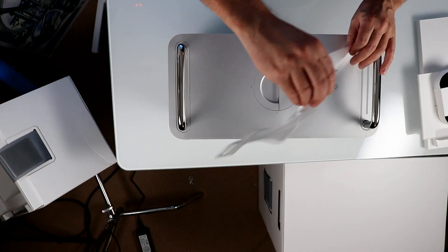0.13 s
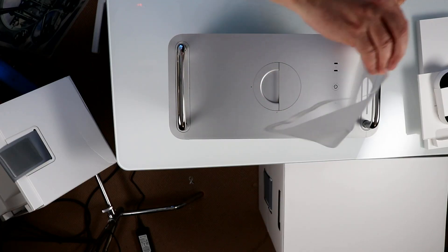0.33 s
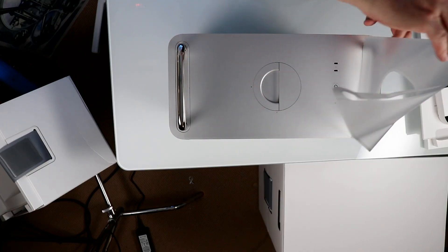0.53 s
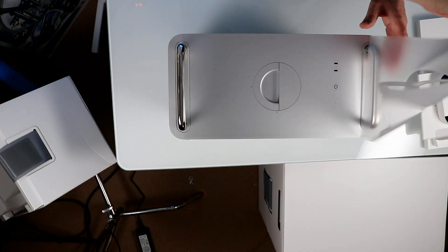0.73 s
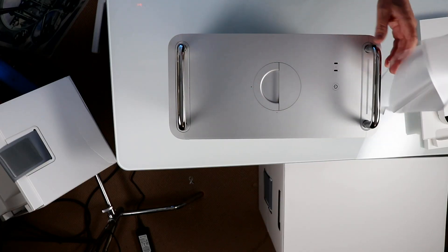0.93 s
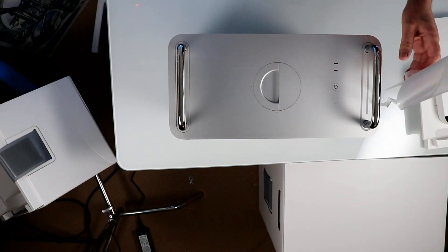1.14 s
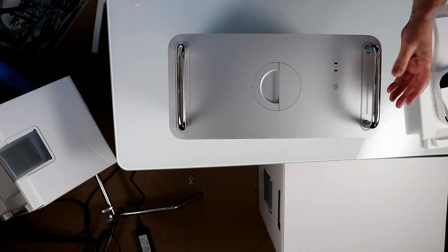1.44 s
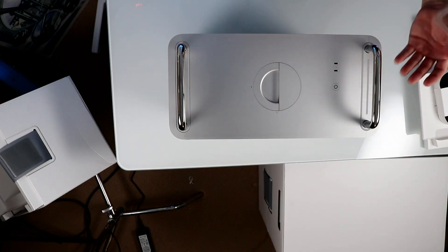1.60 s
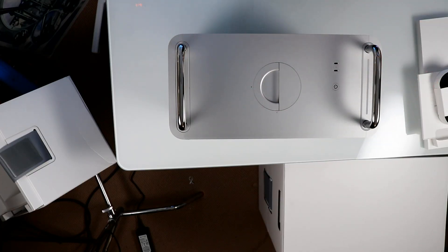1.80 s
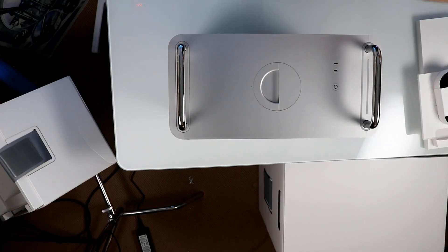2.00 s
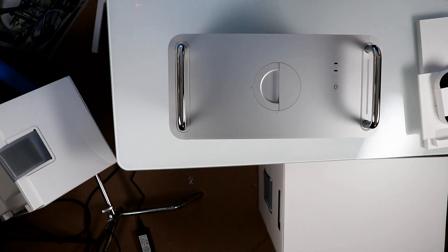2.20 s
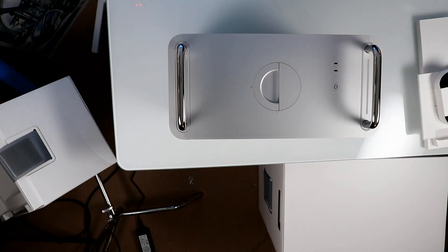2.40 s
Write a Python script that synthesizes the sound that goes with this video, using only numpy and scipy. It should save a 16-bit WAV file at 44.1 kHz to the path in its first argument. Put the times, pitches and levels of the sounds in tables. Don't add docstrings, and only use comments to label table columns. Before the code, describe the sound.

Thin plastic film is pulled off a metal case with a loud sharp snap and brief squeak, then crumpled in dense crackles, released with a light tick and laid aside, close microphone in a quiet room.

```python
import sys
import numpy as np
from scipy import signal
from scipy.fft import rfft, irfft
from scipy.io import wavfile
from scipy.ndimage import uniform_filter1d

SR = 44100
rng = np.random.default_rng(int(sys.argv[2]) if len(sys.argv) > 2 else 0)


def natural_amplitude(level_db):
    exponent = np.asarray(level_db, float) / 20
    return 10 ** exponent


def unload_wav(signal):
    wavfile.write(
        sys.argv[1],
        SR,
        np.round(np.clip(np.atleast_2d(signal).T, -1, 1) * 32767).astype(np.int16),
    )


N = 112454
TIME = np.arange(N) / SR
SPLIT_HZ = 5500


def read(points, hz):
    f, value = np.transpose(points)
    return np.interp(np.log(hz + 1), np.log(f + 1), value)


def evened(x):
    return x / np.sqrt(np.mean(x ** 2) + 1e-20)


def add(mix, s, sound):
    part = mix[max(round(s * SR), 0):][:len(sound)]
    part += sound[:len(part)]


def band(x, lo_hz, hi_hz, order=2):
    edges = np.clip([lo_hz, hi_hz], .1, SR / 2.2)
    return signal.sosfilt(signal.butter(order, edges, "band", fs=SR, output="sos"), x)


def split(x, hz, kind):
    return signal.sosfiltfilt(signal.butter(2, hz, kind, fs=SR, output="sos"), x)


def colour(x, points):
    return irfft(rfft(x) * natural_amplitude(read(points, np.fft.rfftfreq(len(x), 1 / SR))), len(x))


def slow(rate_hz):
    return evened(band(rng.standard_normal(N), rate_hz / 8, rate_hz, order=1))


def envelope(s, level_db):
    return natural_amplitude(np.interp(TIME, s, level_db, -150, -150))


# (frequency [Hz], level [dB])
HUM_LINES = [(59.2, -63.5), (118.4, -64.5), (242.2, -68.5)]
# (frequency [Hz], density [dB per Hz])
AIR_SPECTRUM = [(12, -54.5), (20, -3), (79, -10.5), (262, -13.5), (301, -18), (542, -17.5), (624, -20.5),
                (8650, -48), (16000, -26)]


def background():
    hum = np.zeros(N)
    for hz, level_db in HUM_LINES:
        level = np.sqrt(2) * natural_amplitude(level_db + 1.5 * slow(9.0))
        hum += level * np.sin(2 * np.pi * hz * TIME + .5 * slow(2.9))
    air = evened(colour(rng.standard_normal(N), AIR_SPECTRUM))
    return hum + natural_amplitude(-60 + 1.5 * slow(2.1)) * air


def creases():
    grains_per_s, spread_db, decay_turns = 5000, 2.5, 2.4
    size = natural_amplitude(spread_db * np.minimum(rng.exponential(1, N), 5))
    size *= rng.random(N) < grains_per_s / SR
    kind = rng.integers(0, 24, N)
    out = np.zeros(N)
    for k, hz in enumerate(np.geomspace(400, 15000, 24)):
        turns = np.arange(600) / SR * hz
        tap = np.sin(2 * np.pi * turns) * turns * np.exp(-2 * turns / decay_turns)
        tap *= np.sqrt(hz) / np.linalg.norm(tap)
        out += signal.oaconvolve(size * (kind == k), tap)[:N]
    return evened(out)


def swish():
    _, _, z = signal.stft(rng.standard_normal(N), SR, nperseg=256)
    patches = uniform_filter1d(rng.standard_normal(z.shape), size=2, axis=0)
    patches = evened(uniform_filter1d(patches, size=10, axis=1))
    patchy_db = 2.2
    return evened(signal.istft(z * natural_amplitude(patchy_db * patches), SR, nperseg=256)[1][:N])


# (time [s], rustle level [dB], brightness [dB], fold size [dB])
HANDLINGS = [
    [(0, -43, 2, 3.5), (.04, -48.5, -1.5, 9), (.08, -50, -14, -5), (.14, -36.5, -15, -4),
     (.236, -39.5, -5.5, -2)],
    [(.243, -13, 2, 4), (.26, -21.5, -7, -8), (.28, -22, -9.5, -13.5), (.31, -20, -9.5, -0.5),
     (.38, -33, -10, -4.5), (.48, -39.5, -8.5, 0), (.55, -57, -4, 1.5), (.7, -63.5, -5.5, -3),
     (.817, -59.5, -7, 8)],
    [(.824, -31.5, -6, -4), (.86, -26.5, -4.5, -0.5), (.9, -22, -13.5, -4), (.98, -25, -10, -5.5),
     (1.01, -31.5, -2.5, -4), (1.05, -27.5, -4.5, 0), (1.09, -33, -10, -1), (1.13, -32, -10.5, -2),
     (1.21, -67, -1, 10)],
    [(1.352, -56, -8, -1), (1.358, -42, -12.5, 1.5), (1.4, -35.5, -2.5, -1.5), (1.44, -44, -9.5, 3),
     (1.48, -45.5, -16.5, 7), (1.53, -57.5, -14, 5), (1.62, -64.5, -5, 10.5), (1.75, -61, -8, 8.5),
     (1.88, -65, -2, 11)],
    [(1.92, -74.5, 12.5, -1), (2.02, -61, -4, 2), (2.09, -65.5, 2, -0.5), (2.12, -57, -4, 7.5),
     (2.14, -52.5, -1, -14)],
    [(2.147, -39, -2.5, -6.5), (2.2, -38.5, -9.5, 5), (2.25, -65.5, 2, -3), (2.32, -65, 1, 7.5),
     (2.4, -71.5, 3, 3), (2.45, -67, 3, 8.5), (2.5, -64.5, -3.5, 16.5), (2.55, -66, -1, 12)],
]
# (frequency [Hz], density [dB per Hz])
RUSTLE_SPECTRUM = [(25, -11), (60, 3.5), (200, 0), (700, -4), (1400, -2.5), (4800, -6.5), (5800, -9.5),
                   (16000, -10.5)]


def rustle():
    s, level_db, bright_db, fold_db = np.concatenate([np.array(m) for m in HANDLINGS]).T
    both = colour(creases() + natural_amplitude(3.5) * swish(), RUSTLE_SPECTRUM)
    high = split(both, SPLIT_HZ, "high")
    deep = split(both, 1100, "low")
    bass = split(both, 350, "low")
    shine = natural_amplitude(np.interp(TIME, s, bright_db) + 6.5)
    folds = natural_amplitude(np.interp(TIME, s, fold_db))
    level_db = np.interp(TIME, s, level_db)
    bass_follow, pivot_db = 0.78, -33.5
    bass_db = np.minimum(level_db, pivot_db + bass_follow * (level_db - pivot_db))
    flicker_db = 1.5 * slow(60)
    crisp = both - deep - high + shine * high + folds * (deep - bass)
    crisp *= natural_amplitude(level_db + flicker_db)
    return (crisp + natural_amplitude(bass_db) * np.sqrt(folds) * bass) / both.std()


# (time [s], peak level [dB], pitch [Hz])
AIR_PUSHES = [(.005, -36, 211), (0.156, -37.5, 125), (0.2403, -10.5, 605), (0.2445, -18.5, 74),
              (0.309, -39, 207), (.83, -36, 150), (0.864, -37, 150), (1.079, -47, 50), (1.152, -40, 45),
              (1.355, -37, 50), (1.357, -33, 259), (1.4696, -34, 640), (1.665, -50.5, 100),
              (1.819, -44, 111), (1.899, -33.5, 201), (1.968, -57, 62), (2.142, -39, 51),
              (2.145, -28.5, 450), (2.532, -46, 130)]


def pushes():
    decay_turns, gain_db = 0.47, 4
    out = np.zeros(N)
    for s, peak_db, pitch_hz in AIR_PUSHES:
        turns = np.arange(4000) / SR * pitch_hz
        fade = np.exp(-(turns / decay_turns) ** 0.45)
        add(out, s, -natural_amplitude(peak_db + gain_db) * np.sin(2 * np.pi * turns ** 0.589) * fade)
    return out


def crack(peak_db, pitch_hz, bright_db, length_ms):
    slips_per_ms, q, rise_share = 4.6, 1.315, .08
    t_ms = np.arange(1500) * 1000 / SR
    slipping = rng.random(1500) < slips_per_ms * 1000 / SR
    slips = rng.standard_normal(1500) * (0.14 + slipping)
    slips *= np.minimum(t_ms / (rise_share * length_ms), 1)
    slips *= np.exp(-(t_ms / length_ms) ** 0.99)

    def part(level_db, lo_hz, hi_hz):
        v = band(slips, lo_hz, hi_hz)
        return natural_amplitude(level_db) * v / abs(v).max()

    half = pitch_hz / q / 2
    ring = part(0, pitch_hz - half, pitch_hz + half)
    wide = part(-1, pitch_hz / 2.5, pitch_hz * 2)
    spray = part(bright_db + 22, SPLIT_HZ, 16500)
    thud = part(-17.5, 120, 900)
    return natural_amplitude(peak_db - 3.5) * (ring + wide + spray + thud)


# (time [s], peak level [dB],
# pitch [Hz], brightness [dB], length [ms])
SNAPS_AND_TICKS = [(0.2299, -11.5, 5100, -26, 0.65), (0.2394, 0.5, 3880, -19.5, 2.1),
                   (0.2455, -19, 2620, -21.5, 1.5), (0.2673, -14.5, 2980, -14.5, 3), (0.298, -17, 4570, -19, 2.5),
                   (0.307, -19, 1350, -10.5, 4.8), (0.4605, -20.5, 3930, -30.5, 1.8),
                   (0.8215, -25.5, 2670, -14, 1.2), (0.8228, -22, 2640, -2.5, 0.92),
                   (0.8445, -27.5, 5400, -10, 2.1), (0.8539, -18, 2000, -26.5, 3.1), (0.875, -8.5, 3280, -21, 2.8),
                   (0.8776, -5.5, 3560, -34.5, 1.6), (0.881, -9.5, 3500, -13.5, 3.5),
                   (0.9054, -19, 2380, -6.5, 3.5), (0.9243, -10.5, 7500, -18, 1.16),
                   (0.9455, -3.5, 3600, -11.5, 0.81), (0.9498, -27, 5000, 7, .5), (0.952, -4.5, 3970, -22.5, 2.4),
                   (.9555, -15.5, 4200, -11, 1.7), (0.964, -18, 4070, -27, 1.17), (.991, -18, 1820, -30.5, 1.6),
                   (1.0125, -21, 2300, -15.5, 4.4), (1.0175, -10.5, 2680, -34.5, 2.9),
                   (1.0203, -10, 3000, -30, 3.2), (1.0294, -16.5, 3230, -3.5, 1.3), (1.0651, -9, 3440, -15.5, 2),
                   (1.0693, -16.5, 2730, -40.5, 1.634), (1.103, -19, 2000, -14, 3), (1.1071, -14.5, 2930, -19, 2.6),
                   (1.1095, -13.5, 2630, -12.5, 2), (1.3562, -22, 1730, -9.5, 1.3),
                   (1.3695, -24.5, 1630, -7.5, 4.1), (1.3807, -20.5, 1800, -24, 8.9),
                   (2.1437, -21.5, 2020, -6.5, 1.3), (2.1814, -21, 2500, -13.5, 1),
                   (.110, -34.5, 1440, -30, 4), (0.5595, -44, 3500, -42, 2), (.645, -50.5, 2503, -16, 5),
                  (.777, -52, 1760, -37, 6.3), (0.8084, -40, 3000, -58, 2), (1.432, -25, 1310, -42, 4.2),
                  (1.468, -26, 1920, -21, 1.2), (1.514, -37, 1790, -37.5, 5.6),
                  (1.5494, -40.5, 2230, -31, 3.2), (1.5842, -43.5, 1890, -44, 4.5),
                  (1.646, -48, 1846, -12, 0.91), (1.663, -46.5, 3060, -9.5, 3.1),
                  (1.705, -47, 2240, -37, 6.4), (1.7601, -43.5, 1470, -35, 5.9),
                  (1.769, -47, 4770, -38, 1.8), (1.803, -47, 3000, -9, 2), (1.8976, -58, 965, -12, 4.9),
                  (1.9782, -53, 1480, -7, 4), (1.9913, -40, 1090, -35, 6.3),
                  (2.0256, -46, 1700, -11.5, 2.9), (2.254, -44, 1290, -27, 3),
                  (2.2986, -36.5, 2860, -36, 2.8), (2.464, -49, 976, -18, 2.3), (2.475, -47, 2680, -55, 2),
                  (2.484, -51, 900, -37, 3), (2.5166, -44, 2280, -48, 3.2), (2.531, -52, 1500, -30, 2.7),
                  (2.143, -17, 1820, -48.5, 2.1)]


def cracks():
    out = np.zeros(N)
    for s, *row in SNAPS_AND_TICKS:
        add(out, s, crack(*row))
    return out


# (frequency [Hz], time to fall 60 dB [s])
REVERBERATION = [(200, 0.24), (3000, 0.29), (15000, 0.16)]


def room():
    first_s, spacing = .002, 12
    taps = np.zeros(SR // 2)
    at = np.arange(round(first_s * SR), SR // 2 - 20, spacing)
    taps[at + rng.integers(0, spacing, len(at))] = rng.choice([-1., 1.], len(at))
    hz, t, z = signal.stft(taps, SR, nperseg=128)
    decay_db = -60 * t / read(REVERBERATION, hz)[:, None]
    tail = signal.istft(z * natural_amplitude(decay_db), SR, nperseg=128)[1]
    return tail / np.linalg.norm(tail)


def resonate(x, hz, width_hz):
    turn = np.exp(2j * np.pi * np.cumsum(hz) / SR)
    r = np.exp(-np.pi * width_hz / SR)
    return 2 * (turn * signal.lfilter([1 - r], [1, -r], x / turn)).real


def squeal(table, parts):
    s, hz, level_db = np.transpose(table)
    pitch = np.interp(TIME, s, hz)
    slips = rng.standard_normal(N) * natural_amplitude(slow(150))
    tone = np.zeros(N)
    for ratio, db, width_hz in parts:
        once = resonate(slips, pitch * ratio, width_hz)
        tone += natural_amplitude(db) * evened(resonate(once, pitch * ratio, width_hz))
    return tone * envelope(s, level_db)


# (time [s], pitch [Hz], level [dB])
WHISTLE_GLIDE = [
    (.11, 4430, -65),
    (.135, 4560, -44),
    (.17, 5700, -45),
    (.225, 5240, -56),
    (.27, 5000, -29.5),
    (.3, 4900, -27),
    (.345, 5000, -33),
    (.37, 4700, -44),
]


def whistle():
    return squeal(WHISTLE_GLIDE, [(0.94, 0, 750)])


# (time [s], pitch [Hz], level [dB])
SQUEAK_GLIDE = [
    (.131, 1760, -66),
    (.134, 1740, -47.5),
    (.165, 1700, -37.5),
    (.18, 1510, -38.5),
    (.205, 1300, -42),
    (.235, 1240, -44),
]
# (pitch ratio [1], level [dB], width [Hz])
SQUEAK_MODES = [(1, 0, 520), (2.1, -8, 1400)]


def squeak():
    return squeal(SQUEAK_GLIDE, SQUEAK_MODES)


# (time [s], pitch [Hz], level [dB])
FLAP_GLIDE = [
    (.29, 1220, -36.5),
    (.315, 1330, -37),
    (.385, 1450, -43.5),
    (.43, 1490, -61),
]
# (pitch ratio [1], level [dB], width [Hz])
FLAP_MODES = [(1, 0, 250), (1.6, -2, 300), (2.6, 0, 400)]


def flap():
    return squeal(FLAP_GLIDE, FLAP_MODES)


# (time [s], pitch [Hz], level [dB])
EDGE_GLIDE = [
    (1.354, 12600, -70),
    (1.3555, 12970, -29.5),
    (1.385, 12600, -39),
    (1.46, 12000, -49),
]


def fizz():
    return squeal(EDGE_GLIDE, [(1, 0.0074, 4000)])


# (time [s], level [dB])
SLUMP_LEVEL = [
    (1.872, -64),
    (1.9, -50),
    (1.98, -45),
    (2.05, -69),
    (2.1, -58),
]


def slump():
    lumps = band(rng.standard_normal(N) * natural_amplitude(2 * slow(103)), 60, 1400, order=1)
    lumps = evened(colour(lumps, [(100, 2.5), (1500, -18.5)]))
    return lumps * envelope(*np.transpose(SLUMP_LEVEL))


def scene():
    film = rustle() + pushes() + whistle() + squeak() + flap() + fizz() + slump()
    hits = cracks()
    echoes = signal.fftconvolve(hits, room())[:N]
    return (background() + film + hits + natural_amplitude(-12) * echoes)[None]


def roll_off(x):
    return signal.sosfilt(signal.butter(12, 16000, fs=SR, output="sos"), x)


def record(dry):
    clip = 1.6
    x = band(clip * np.tanh(dry / clip), 35, 12000)
    x = signal.sosfilt(signal.butter(14, 15700, fs=SR, output="sos"), x)
    threshold_db, width_db, depth_db, close_db_per_s = -53, 9.5, 6.5, 158
    power_db = 10 * np.log10(abs(uniform_filter1d(x[0] ** 2, 400)) + 1e-12)
    fall_db = TIME * close_db_per_s
    held_db = np.maximum.accumulate(power_db + fall_db) - fall_db
    x = x * natural_amplitude(depth_db * np.clip((held_db - threshold_db) / width_db, -1, 0))
    mix = np.clip(x, -1, 1)
    return roll_off(mix)


dry = scene()
out = record(dry)
unload_wav(out)
```